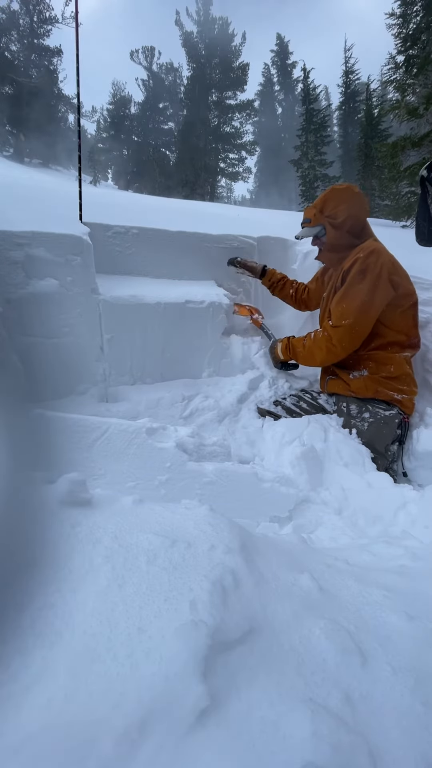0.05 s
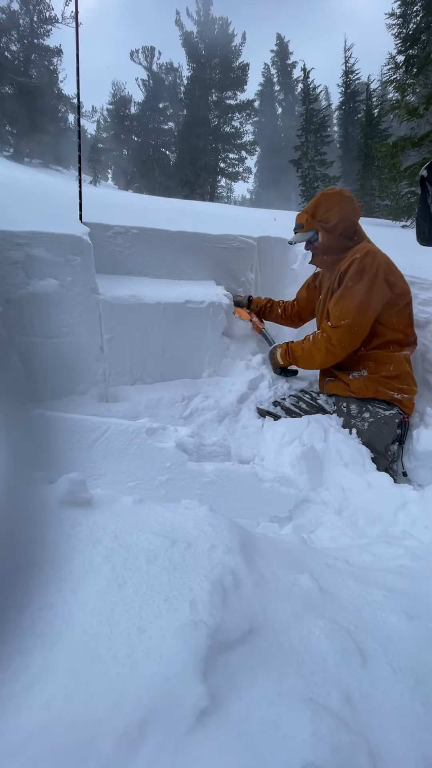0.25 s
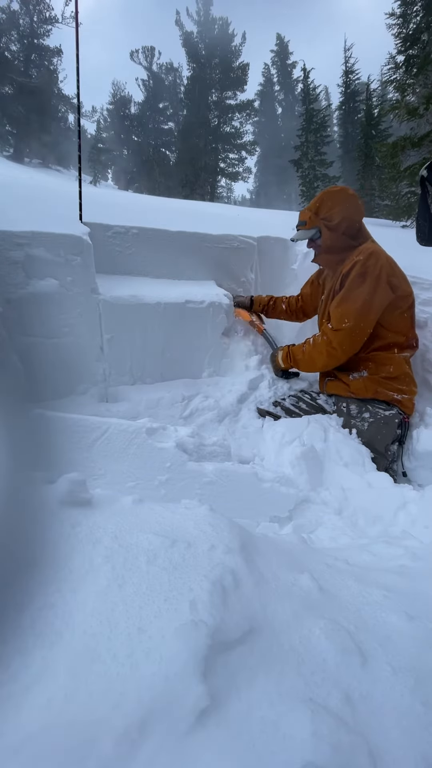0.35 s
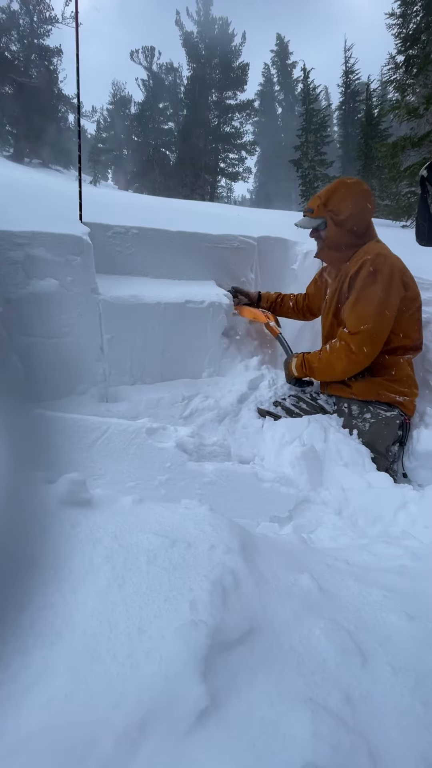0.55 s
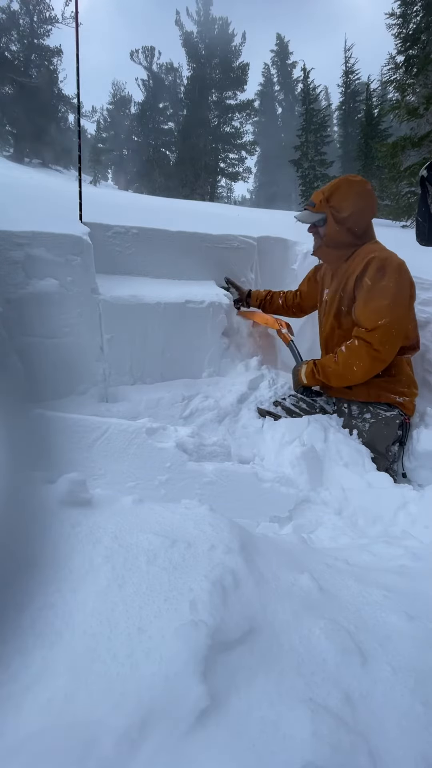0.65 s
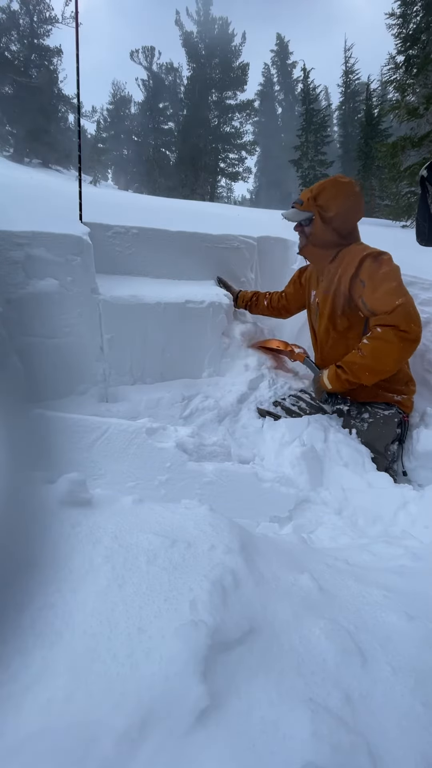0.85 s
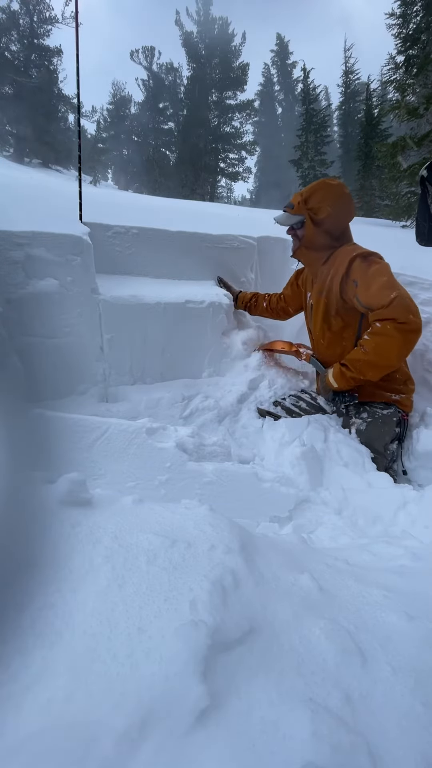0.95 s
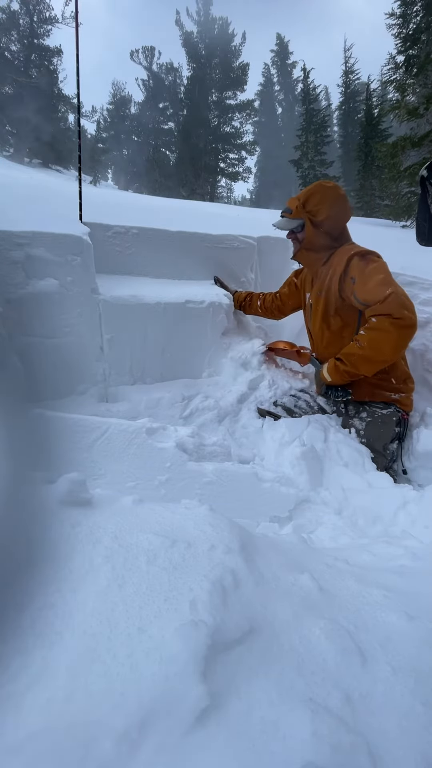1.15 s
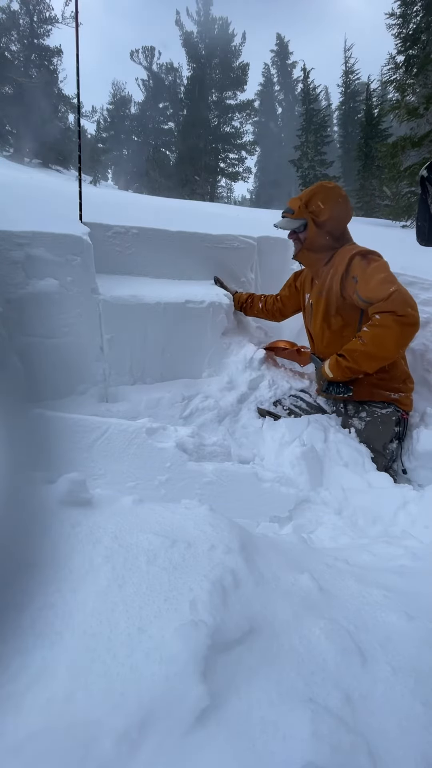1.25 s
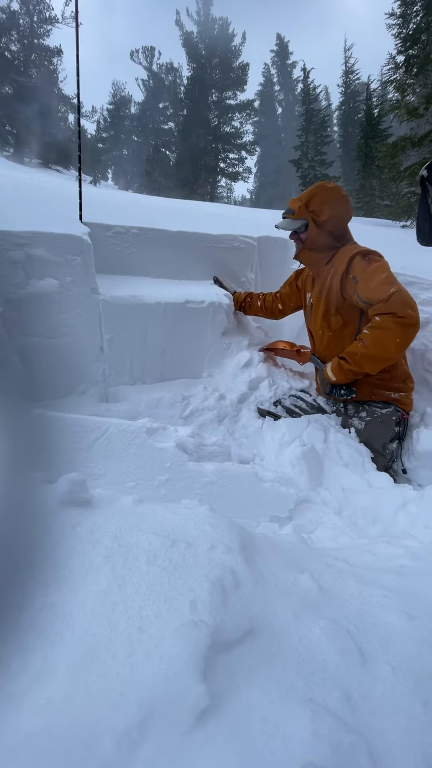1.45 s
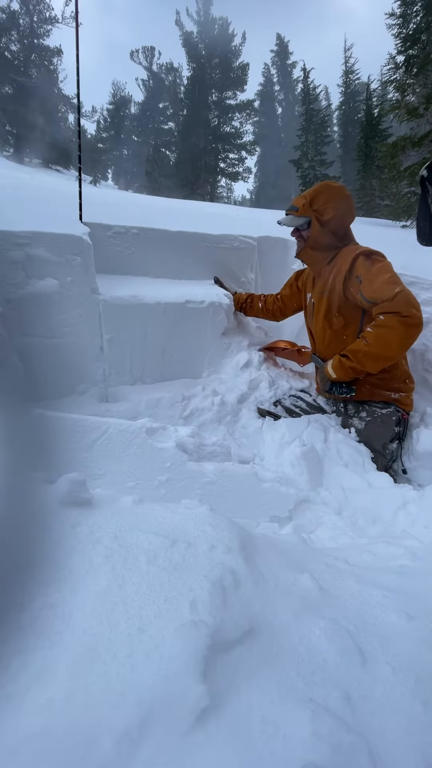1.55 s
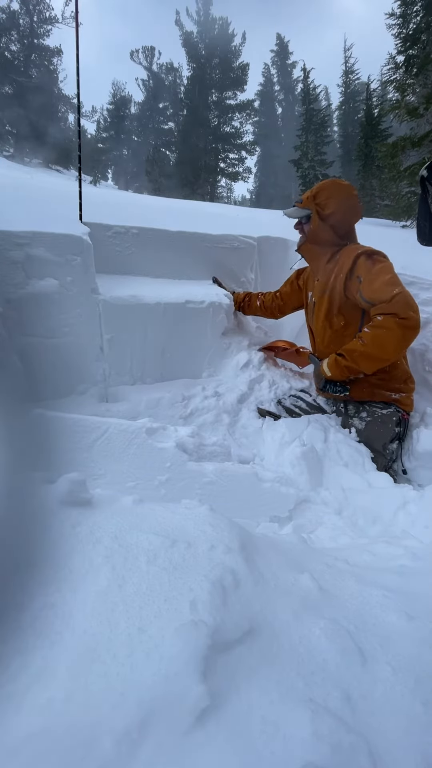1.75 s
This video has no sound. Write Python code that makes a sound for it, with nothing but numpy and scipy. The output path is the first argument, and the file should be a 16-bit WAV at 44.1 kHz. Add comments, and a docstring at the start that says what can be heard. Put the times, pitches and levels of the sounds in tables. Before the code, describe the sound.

A gloved hand slaps a shovel blade lying on a snow column, making one dull, crunchy thump. The shovel slides off with a grainy rustle and small clumps drop, heard close up in a windy forest.

```python
"""A snow column in a windy forest, heard from close by on a pair of microphones.
Wind rushes evenly in the trees and gusts buffet the microphones. At 0.2 s a gloved hand slaps a
shovel blade lying on the column: the snow crunches, the blade knocks and the column thumps with
a sinking pitch. Then the shovel slides off in a rustle of grains, a few clumps drop with soft
thuds, and loose snow sifts down to the end."""
import sys
import numpy as np
from scipy import signal
from scipy.fft import rfft, irfft
from scipy.io import wavfile

SR = 44100
rng = np.random.default_rng(int(sys.argv[2]) if len(sys.argv) > 2 else 0)


def generate_wav(signal):
    """Clip the signal to [-1, 1] and save it as 16-bit WAV at the path in sys.argv[1]."""
    frames = np.transpose(np.atleast_2d(signal))
    scaled = np.clip(frames, -1, 1) * 32767
    pcm = np.round(scaled).astype(np.int16)
    wavfile.write(sys.argv[1], SR, pcm)


N = 79380
TIME = np.arange(N) / SR
BIN_HZ = np.fft.rfftfreq(N, 1 / SR)


def column_thump():
    """The column gives way under the hand; its pitch sinks as the blow spreads, and the pack shakes on."""
    start_s, attack_s, hold_s = 0.2103, 0.0061, 0.0048
    start_hz, end_hz, sag_s, sag_steepness = 230, 53, 0.00885, 2.92
    age = np.maximum(TIME - start_s, 0)
    hz = end_hz + (start_hz - end_hz) / (1 + (age / sag_s) ** sag_steepness)
    swing = -np.sin(2 * np.pi * np.cumsum(hz * (age > 0)) / SR)
    column = from_db(-1.25) * envelope(start_s, attack_s, hold_s, t60=0.057)
    snowpack = from_db(-30.5) * envelope(start_s, attack_s, hold_s, t60=0.44)
    return swing * (column + snowpack)


def blade_knock():
    """The gloved hand lands softly: one dull knock, then a faint ring damped by glove and snow."""
    # Modes of the blade. Each row: pitch in Hz, level in dB, seconds to fall 60 dB.
    modes = [(540, -20, 0.031), (760, -36, 0.055), (946, -25, 0.033), (1090, -29.5, 0.023)]
    start_s, width_s, knock_hz = 0.2145, 0.00084, 655
    age = TIME - start_s
    knock = from_db(-5) * np.exp(-0.5 * (age / width_s) ** 2) * np.cos(2 * np.pi * knock_hz * age)
    return knock + sum(from_db(db) * ring(start_s, hz, attack=0.0027, t60=t60) for hz, db, t60 in modes)


def snow_crunch():
    """The crust snaps first, then grains break in a short dense burst as the blade is pressed in."""
    # Spectrum of crushed snow. Each row: frequency in Hz, level in dB per Hz.
    spectrum = [(200, -60), (420, -60), (700, -53.5), (1150, -78), (2000, -77.5), (3000, -83.5),
                (4500, -83), (6700, -83), (10000, -98), (12000, -107), (16000, -119)]
    start_s, attack_s = 0.2076, 0.00094
    snap = from_db(3) * envelope(start_s, attack_s, hold=0, t60=0.0026)
    press = envelope(start_s, attack_s, hold=0.0061, t60=0.013)
    return colour(grains(per_s=9800) * (press + snap), spectrum)


def sliding_snow():
    """Fine grains spray and rustle over the blade and down the column's wall."""
    # Spills of snow. Each row: start, attack, hold and time to fall 60 dB in seconds, level in dB.
    spills = [(0.208, 0.016, 0.019, 0.16, 2.5), (.23, .03, 0.11, 0.56, -12),
              (0.374, 0.077, 0.076, 1.01, -0.5), (0.726, 0.051, 0.019, 2.0, -2.5),
              (0.788, 0.017, 0.0072, 0.072, 4), (1.202, 0.23, 0.87, 1.5, -15)]
    # Spectrum of the rustle. Each row: frequency in Hz, level in dB per Hz.
    spectrum = [(500, -96), (1500, -100), (2700, -99.5), (4300, -103), (6200, -103.5), (7800, -113),
                (9800, -116), (11500, -137), (14000, -152)]
    power = sum((from_db(db) * envelope(start, attack, hold, t60)) ** 2
                for start, attack, hold, t60, db in spills)
    return colour(grains(per_s=8100) * np.sqrt(power), spectrum)


def snow_on_blade():
    """Crunch and rustle, coloured by the metal that the grains hit."""
    # High resonances of the blade. Each row: centre in Hz, width in Hz, boost in dB.
    resonances = [(1860, 150, 8), (3550, 120, 3.5), (3800, 90, 5.5), (4250, 170, 3.5), (4420, 88, 6.5),
                  (5400, 77, 2.5), (5850, 82, 4), (6050, 200, 3.5), (6720, 360, 2.5), (8070, 250, 0),
                  (9560, 300, 2.5)]
    snow = snow_crunch() + sliding_snow()
    metal = sum((from_db(db) - 1) * signal.lfilter(*signal.iirpeak(hz, hz / width, fs=SR), snow)
                for hz, width, db in resonances)
    return snow + metal


def falling_clumps():
    """Clumps of snow land with soft little thuds."""
    # Each row: start in seconds, level in dB, pitch in Hz, seconds to fall 60 dB.
    landings = [(.6165, -29.5, 630, 0.014), (.8045, -33.5, 800, 0.041), (0.8052, -31, 300, 0.038),
                (.811, -35, 150, 0.072), (1.52, -39, 68, 0.11)]
    return sum(from_db(db) * ring(start, hz, attack=0.0021, t60=t60) for start, db, hz, t60 in landings)


def forest_wind():
    """Wind in the surrounding trees, an even rush."""
    # Spectrum of the rush. Each row: frequency in Hz, level in dB per Hz.
    spectrum = [(30, -83), (100, -80.5), (250, -74), (340, -78.5), (520, -75.5), (790, -80.5), (960, -84),
                (1200, -89), (2050, -93), (3200, -106), (6200, -118), (7800, -128), (10000, -133),
                (12500, -152)]
    return colour(rng.standard_normal(N) * from_db(0.07 * drift(hz=2.8)), spectrum)


def air_at_microphones():
    """Diffuse wind, different at each microphone, and gusts that buffet mainly the left one."""
    # Spectra of diffuse wind and of buffeting. Each row: frequency in Hz, level in dB per Hz.
    diffuse_spectrum = [(30, -84), (100, -84), (300, -91.5), (800, -87), (980, -101), (1300, -89.5),
                        (2500, -106), (5000, -122), (10000, -138), (14000, -146)]
    buffet_spectrum = [(20, -89), (55, -71), (120, -72.5), (250, -87.5), (600, -105), (4000, -160)]
    swing_db, right_db = 4.5, -14
    gusts = rng.standard_normal((2, N)) * from_db(swing_db * drift(hz=4.6))
    diffuse = colour(rng.standard_normal((2, N)), diffuse_spectrum)
    return diffuse + colour(gusts, buffet_spectrum) * from_db([[0], [right_db]])


def microphone_pair(left):
    """The right microphone has less bass than the left and is out of phase in the low middle."""
    # Right against left. Each row: frequency in Hz, level in dB, phase lead in radians.
    response = [(35, -12, .1), (70, -11.5, .1), (111, -13, 0.34), (170, -11, 2.54), (273, -4.5, 2.26),
                (430, -3, 2.925), (710, 2.5, 2.64), (926, 3.5, 3.15), (1224, -2, 4.02), (1700, -7, 5.27),
                (2580, 2.5, 6.2), (8000, 0, 6.25)]
    gain = from_db(at_hz(response, BIN_HZ))
    phase = at_hz(response, BIN_HZ, column=2)
    right = irfft(rfft(left) * gain * np.exp(1j * phase), N)
    return np.array([left, right])


def from_db(db):
    """Decibels to gain."""
    return 10 ** (np.asarray(db) / 20)


def at_hz(table, hz, column=1):
    """Read a column of a table on a log-frequency axis."""
    table = np.array(table)
    return np.interp(np.log(np.maximum(hz, 1)), np.log(table[:, 0]), table[:, column])


def colour(white, spectrum):
    """Give white sound of rms 1 a spectrum in dB per Hz."""
    return irfft(rfft(white) * from_db(at_hz(spectrum, BIN_HZ)), N) * np.sqrt(SR / 2)


def drift(hz):
    """A random wander, mostly slower than hz, with a spread of 1."""
    slow = irfft(rfft(rng.standard_normal(N)) / (1 + (BIN_HZ / hz) ** 2), N)
    return (slow - slow.mean()) / slow.std()


def envelope(start, attack, hold, t60):
    """Smooth rise, hold, then a fall of 60 dB every t60; all in seconds."""
    age = TIME - start
    rise = np.sin(np.pi / 2 * np.clip(age / attack, 0, 1)) ** 2
    return rise * np.exp(-np.log(1000) * np.maximum(age - attack - hold, 0) / t60)


def grains(per_s, spread_db=3.5):
    """Ice grains snapping at random, in uneven sizes; rms 1."""
    snaps = (rng.random(N) < per_s / SR) * rng.choice([-1, 1], N)
    clicks = snaps * from_db(spread_db * np.minimum(rng.exponential(1, N), 4))
    return clicks / clicks.std()


def ring(start, hz, attack, t60):
    """One mode set ringing by a soft contact."""
    return envelope(start, attack, 0, t60) * np.sin(2 * np.pi * hz * (TIME - start))


def scene():
    """The slap and the loose snow in front of the microphones, the forest wind behind."""
    # Scattered grains reach the two sides differently.
    scatter = from_db(-9) * snow_on_blade() * np.array([[1], [-1]])
    sources = column_thump() + blade_knock() + snow_on_blade() + falling_clumps() + forest_wind()
    return microphone_pair(sources) + scatter + air_at_microphones()


def record(dry):
    """A steep low-pass cuts the highest treble on both channels."""
    cutoff_hz = 12500
    return signal.sosfilt(signal.ellip(8, 0.1, 70, cutoff_hz, fs=SR, output="sos"), dry)


dry = scene()
out = record(dry)
generate_wav(out)
```